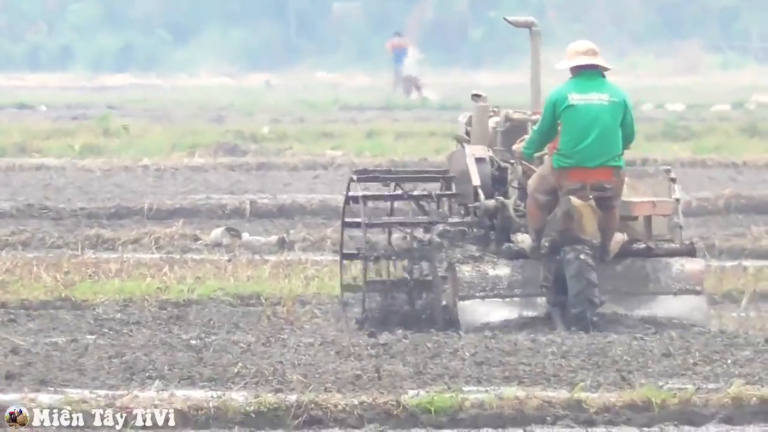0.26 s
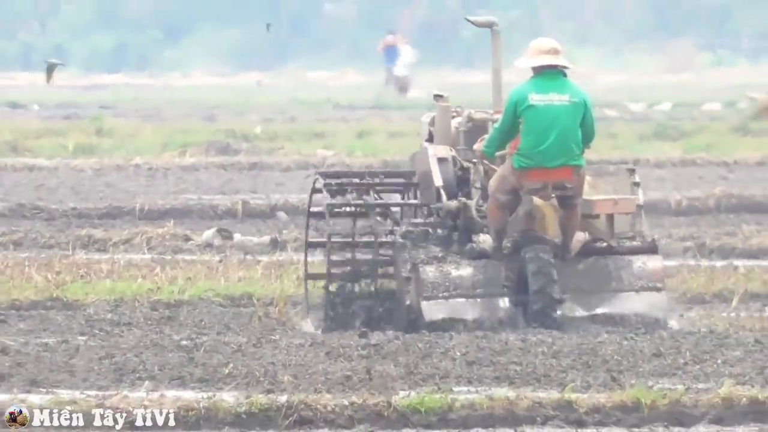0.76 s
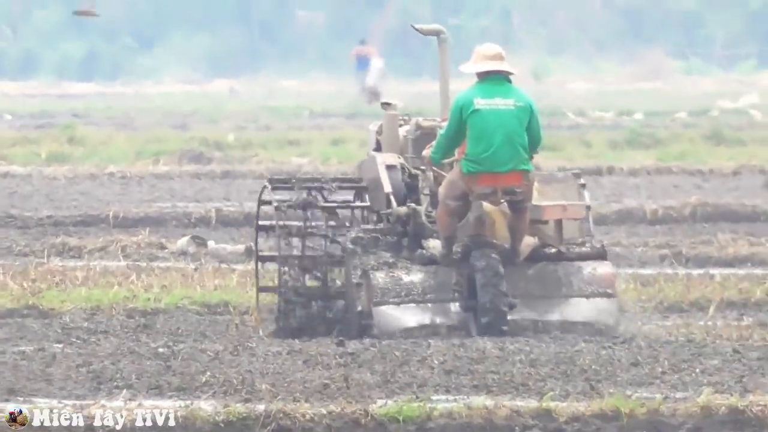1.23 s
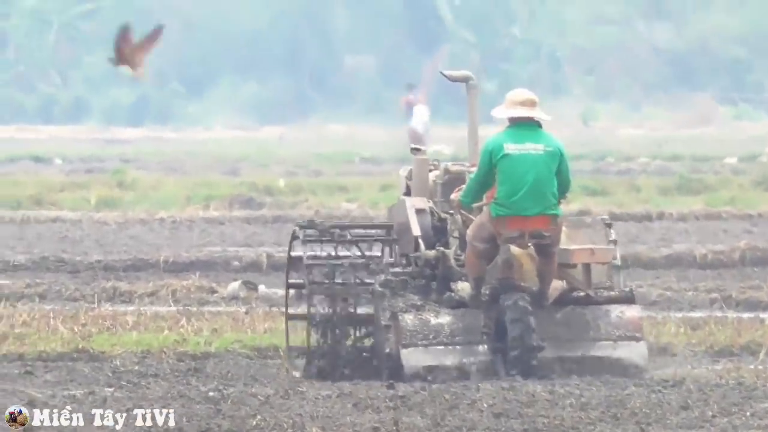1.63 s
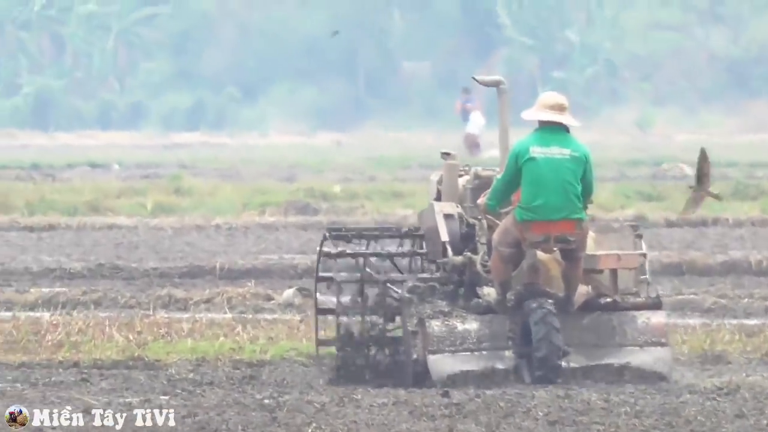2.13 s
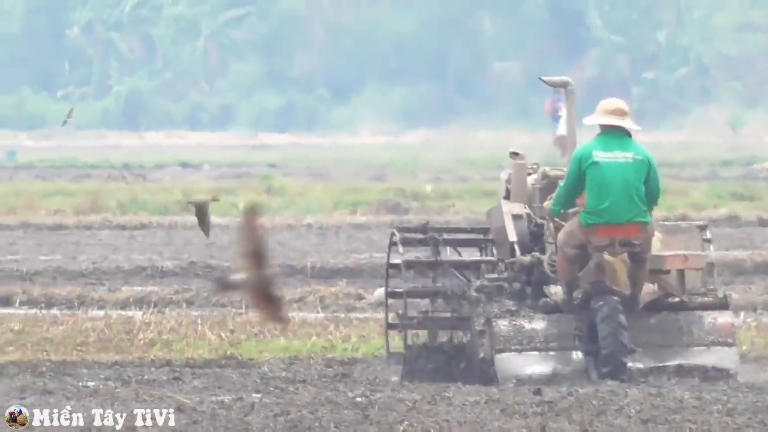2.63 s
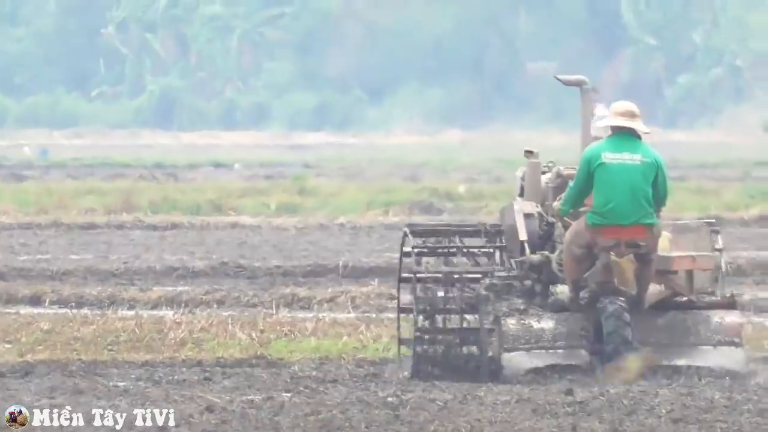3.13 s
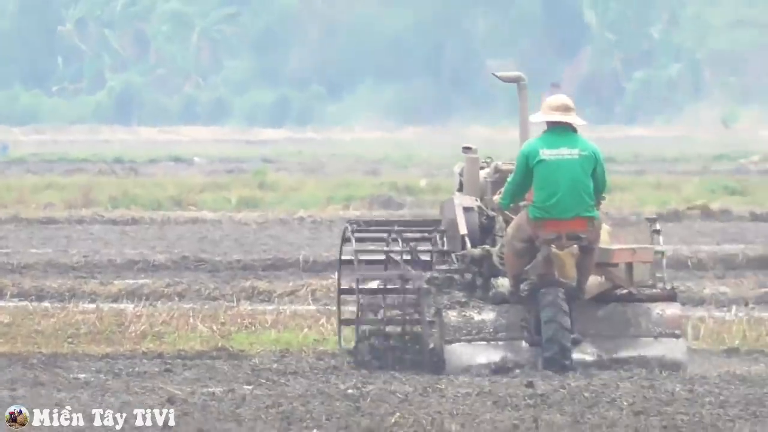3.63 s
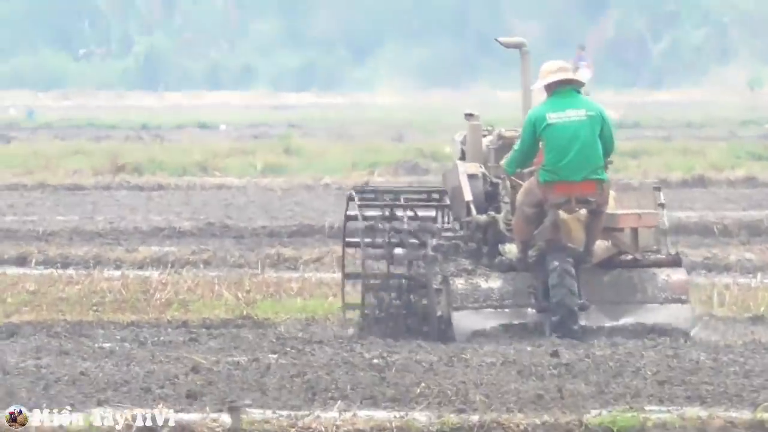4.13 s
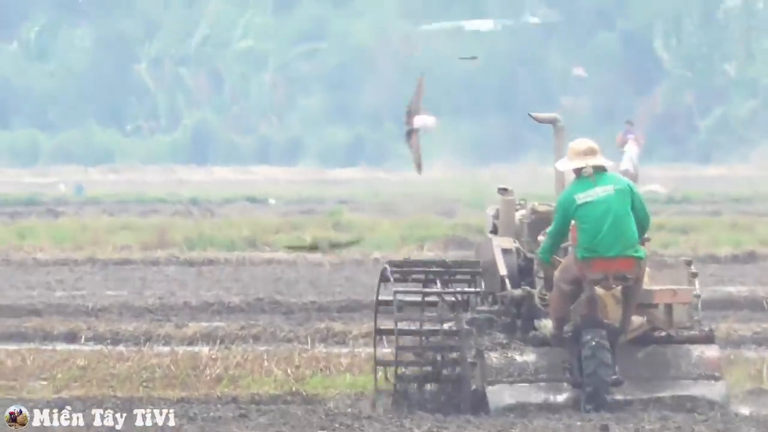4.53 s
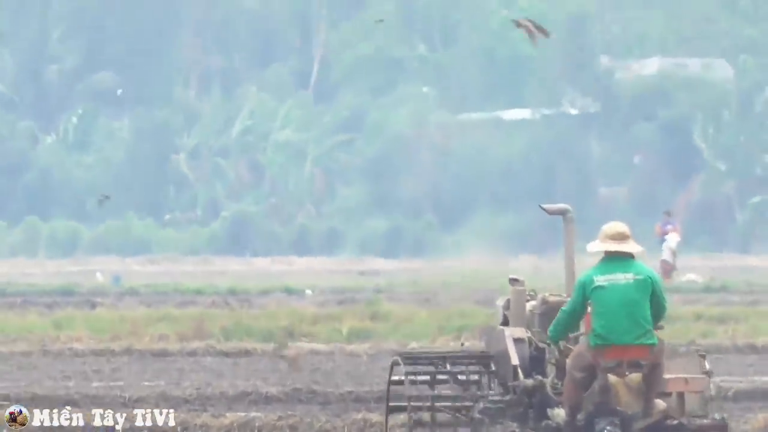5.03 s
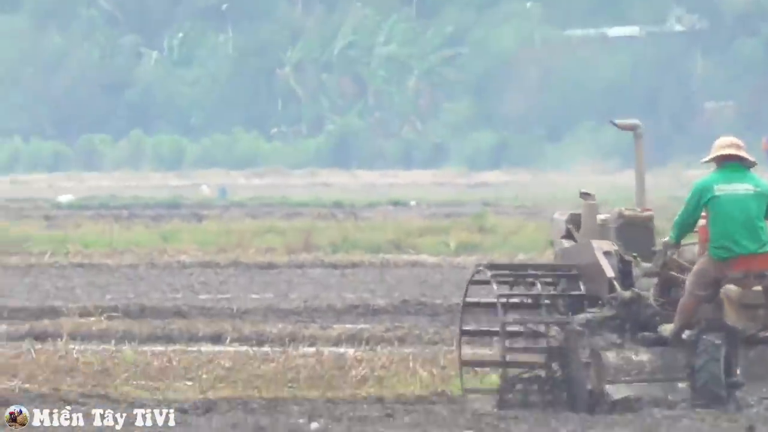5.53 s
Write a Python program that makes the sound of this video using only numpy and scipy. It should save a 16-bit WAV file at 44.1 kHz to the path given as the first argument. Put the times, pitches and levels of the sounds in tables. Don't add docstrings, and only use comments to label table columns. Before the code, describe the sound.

A windy open field, heard through a bare microphone. From the start, deep wind buffeting dominates: irregular soft thumps and a fluttering rumble, very close and much louder than anything else, broken by tiny lulls. Far off, a single-cylinder tiller runs at nearly constant speed, about fifteen firings a second. Only its upper part gets through: short, dry, hissing puffs with a slightly pipe-like rasp, over a thin mechanical rattle. It is faint at first, comes forward from about 0.5 s and is strongest around 1.2-1.8 s, then grows more uneven. A barely audible thin whine wavers between about 1.2 and 4.3 s. Scattered clacks of metal and mud appear near 2.3 s and more often from 4.6 to 5.6 s. After 3.2 s the gusts get stronger and rougher, with sharper flutters near 5.4 s, while the engine's puffs are generally weaker. Wind and engine continue to the end, 5.76 s.

```python
import sys
import numpy as np
from scipy import signal
from scipy.fft import rfft, irfft
from scipy.io import wavfile
from scipy.ndimage import uniform_filter1d

SR = 44100
rng = np.random.default_rng(int(sys.argv[2]) if len(sys.argv) > 2 else 0)


def nominal_scale(level):
    x = np.asarray(level, float) / 20
    return 10 ** x


def int16_out(signal):
    q = np.round(np.clip(np.atleast_2d(signal).T, -1, 1) * 32767)
    wavfile.write(sys.argv[1], SR, q.astype(np.int16))


N = 254016

# (time [s], rate [firings/s])
SPEED = [
    (0, 15.0),
    (1.95, 15.0),
    (2.15, 15.106),
    (3.94, 15.106),
    (4.14, 15.035),
    (5.76, 15.02),
]
# (time [s], lateness [ms])
HUNTING = [(0, -1), (.35, -1.8), (1.2, 1.2), (1.5, .5), (1.9, -2), (2.2, -3.5), (2.55, -4.8), (2.75, -3),
           (2.9, -.8), (3.4, .3), (4.2, .4), (4.9, 1.5), (5.3, 0), (5.76, -1.8)]
# (time [s], strength [dB], brightness [dB])
BARK = [(0, -70, 0), (.25, -62.5, 2), (.39, -54, -13), (1.1, -56, -1), (2.3, -55, -4), (2.8, -57, 1),
        (3.2, -54.5, -3), (3.8, -53.5, -12), (4.35, -51, -6), (4.44, -63, -7), (4.52, -54.5, -6),
        (4.75, -57.5, -5), (4.97, -50.5, -12), (5.25, -58, 2), (5.76, -55, -7)]
# (time [s], strength [dB], brightness [dB], loudest pitch [Hz])
ODD_FIRINGS = [(0.521, -49.5, -7, 2660), (0.587, -51.5, -5, 2870), (0.654, -47, -3.5, 3730),
               (0.721, -49.5, -3, 3080), (0.787, -50.5, 2, 3260), (0.854, -54.0, 2.5, 2840),
               (0.921, -53.5, 0, 3500), (0.987, -54.5, -1.5, 3380), (1.187, -49, -5, 2900),
               (1.254, -49.5, -3.0, 3340), (1.321, -45.5, -4, 3530), (1.387, -46, -9.5, 2990),
               (1.454, -48.5, -8, 2830), (1.521, -45, -10.5, 2520), (1.587, -46, -12, 3220),
               (1.654, -45, -8, 3250), (1.721, -45.5, -17, 2620), (1.787, -49.5, -5, 2880),
               (1.854, -51, -2, 2280), (1.921, -53.5, -3, 3280), (1.987, -50.5, -4, 2860),
               (2.054, -53, -1.5, 2490), (2.12, -53, -5, 3100), (2.517, -51, -8, 3200),
               (2.584, -49, -6, 2860), (2.65, -53, 2.5, 2620), (2.716, -51.5, -3.5, 2490),
               (2.848, -49.5, -13, 2340), (2.915, -48.5, -4, 2650), (2.981, -50.5, -1.5, 2740),
               (3.113, -50.5, -9, 2860), (3.246, -50, -8, 3080), (3.312, -50, -9, 2560),
               (3.378, -58.5, 3, 2380), (3.444, -57.5, 2, 2380), (3.51, -52, -9, 2720),
               (3.643, -52, -8, 2460), (3.709, -52.5, -3, 2400), (3.908, -49, -10, 2580),
               (3.974, -54, -8, 3320), (4.04, -54, -3, 2360), (4.106, -52, -2, 2480),
               (4.173, -50, -6, 2940), (4.239, -51.5, -4.5, 3240), (5.038, -51, -7.5, 3350),
               (5.104, -54.5, 0, 3330), (5.171, -50.5, -6.5, 3340), (5.371, -49, -9, 2650),
               (5.504, -51.5, -8, 3130), (5.703, -51, -4, 3420)]
# (time [s], first [Hz], second [Hz], outlet [Hz])
RINGS = [(0.521, 2540, 3160, 9097), (0.587, 2411, 3466, 7375), (0.654, 3750, 4270, 9100),
         (0.721, 2900, 4270, 8540), (0.787, 4230, 3100, 9840), (0.854, 2422, 4630, 9400),
         (0.921, 3680, 2950, 8171), (0.987, 3400, 2910, 9300), (1.188, 3170, 2000, 8360),
         (1.254, 3180, 3980, 9614), (1.321, 3950, 3300, 8900), (1.387, 2500, 3720, 9237),
         (1.454, 3070, 2180, 5300), (1.521, 2880, 2300, 8451), (1.587, 3520, 2950, 7000),
         (1.654, 2800, 3930, 8279), (1.721, 2099, 4240, 7310), (1.787, 3510, 2411, 7100),
         (1.853, 2153, 4060, 10600), (1.921, 4440, 2920, 9302), (1.987, 3251, 2228, 8344),
         (2.054, 2340, 3359, 6061), (2.12, 2648, 3380, 7224), (2.517, 3430, 2960, 8473),
         (2.583, 3300, 2110, 7202), (2.65, 2454, 3070, 8700), (2.715, 2480, 2045, 9560),
         (2.848, 2300, 2853, 8451), (2.914, 2850, 2170, 8204), (2.981, 3700, 2570, 7900),
         (3.113, 2928, 2070, 7396), (3.246, 4040, 2140, 9011), (3.312, 2460, 3779, 6370),
         (3.378, 2110, 3760, 8387), (3.444, 2196, 3640, 8800), (3.51, 2870, 2110, 9410),
         (3.643, 2090, 3760, 9200), (3.709, 2476, 3450, 8860), (3.908, 2450, 3500, 8850),
         (3.974, 3219, 3780, 8720), (4.04, 2540, 3570, 8914), (4.108, 2500, 3079, 7084),
         (4.173, 3628, 2380, 6350), (4.239, 2540, 3630, 8882), (5.038, 3811, 2885, 9205),
         (5.104, 4069, 2939, 8764), (5.171, 3122, 3860, 8400), (5.37, 2800, 3460, 6350),
         (5.504, 4274, 3068, 9119), (5.703, 3830, 4470, 9130)]
# (frequency [Hz], width [Hz], level [dB])
STACK = [(2100, 470, -12), (2345, 620, 8), (2990, 1900, -3), (3490, 440, 4.5), (4150, 880, 5.5),
         (4400, 540, 2)]
# (frequency [Hz], width [Hz], level [dB])
OUTLET = [(5350, 350, 2), (6240, 450, -1), (7240, 640, -4), (8460, 870, -7), (9130, 1100, -3.5),
          (10100, 520, -8.5), (10800, 1000, -6), (12800, 2400, -16)]
# (frequency [Hz], density [dB per Hz])
RATTLE_SPECTRUM = [(900, -7), (1500, -13), (1900, -5), (2500, -9), (3800, -10.5), (4500, -11.5),
                   (5000, -16.5), (5800, -16), (6600, -15.5), (8600, -12), (10000, -14.5), (12000, -19.5),
                   (14000, -25), (16000, -24)]
# (time [s], level [dB])
RATTLE_LEVEL = [(0.0, -60), (0.24, -60), (0.58, -56), (0.87, -58.5), (1.2, -57.5), (1.43, -56.5),
                (2.1, -56), (2.31, -54.5), (3.13, -56), (3.29, -55), (3.64, -57), (4.19, -56), (4.62, -61),
                (4.83, -60), (5.34, -55), (5.47, -54.5), (5.76, -58.5)]
# (time [s], peak [dB], treble against peak [dB])
CLACKS = [(2.0921, -54, 9), (2.295, -43.5, 3), (3.095, -51.5, 10), (3.2276, -60, -30), (4.2954, -51.5, 9.5),
          (4.594, -47, 1), (4.9337, -54, -29), (5.0934, -48, 5), (5.1956, -56, 8), (5.296, -41, -7),
          (5.476, -41, -40), (5.5523, -40, -21.5), (5.594, -49, 2)]
# (time [s], frequency [Hz], level [dB])
WHINE = [(1.2, 1950, -74), (1.42, 1945, -60), (1.65, 1990, -60), (1.95, 1960, -70), (2.2, 1955, -74),
         (2.4, 1950, -69), (2.7, 1970, -73), (3.0, 1950, -71), (3.3, 1930, -80), (3.5, 1965, -69),
         (3.7, 1970, -58), (3.95, 1955, -70), (4.3, 1945, -76)]
# (time [s], level [dB])
WIND = [(0.0, -14), (0.19, -21), (0.24, -22.5), (0.32, -20.5), (0.95, -18.5), (1.4, -21.5), (2.4, -22),
        (2.75, -21.5), (3.0, -20), (3.1, -21.5), (3.42, -18.5), (3.5, -21), (3.75, -20), (4.2, -18),
        (4.8, -20), (5.1, -20), (5.5, -18), (5.76, -18)]
# (frequency [Hz], density [dB per Hz])
RUMBLE_SPECTRUM = [(12, -54), (20, -17), (113, -1.5), (184, -2.5), (377, -9), (651, -23), (816, -22.5),
                   (985, -25), (1800, -52.5), (2340, -86), (3960, -120)]
# (time [s], peak [dB], frequency [Hz])
BUFFETS = [(0.024, -7.5, 181), (0.062, -9, 230), (0.087, -8, 208), (0.145, -13, 214), (0.166, -11.5, 183),
           (0.184, -12, 236), (0.29, -12.5, 171), (0.314, -12.5, 158), (0.388, -12, 220), (0.418, -10, 189),
           (0.455, -8, 240), (0.492, -8.5, 160), (0.556, -11.5, 219), (0.583, -12.5, 161),
           (0.627, -16, 190), (0.676, -14, 202), (0.698, -10, 180), (0.72, -11, 159), (0.796, -14.3, 183),
           (0.844, -12.5, 264), (0.89, -6, 194), (0.923, -13.7, 185), (0.96, -6, 209), (1.001, -7.5, 212),
           (1.049, -11.5, 203), (1.085, -10.5, 234), (1.196, -7.5, 195), (1.262, -12.5, 237),
           (1.311, -13, 248), (1.41, -14.5, 194), (1.442, -11.5, 162), (1.48, -15.8, 126),
           (1.542, -14, 205), (1.596, -11.5, 267), (1.664, -10, 161), (1.72, -14, 181), (1.791, -19, 176),
           (1.822, -14.5, 212), (1.869, -9, 212), (1.897, -23, 182), (2.006, -12, 174), (2.079, -9, 159),
           (2.173, -16, 194), (2.23, -14.5, 148), (2.388, -13, 200), (2.428, -15, 177), (2.567, -14, 193),
           (2.659, -11, 165), (2.828, -13.5, 206), (2.873, -7, 191), (2.911, -13, 148), (2.95, -11, 121),
           (2.988, -5.5, 191), (3.033, -10, 189), (3.105, -14.5, 175), (3.164, -8.5, 187),
           (3.251, -14, 199), (3.311, -7.5, 154), (3.368, -14, 165), (3.397, -9.5, 206),
                (3.425, -6.5, 167), (3.468, -10.5, 230), (3.556, -12.5, 171), (3.573, -10.5, 208),
                (3.596, -10, 228), (3.621, -13, 152), (3.654, -13, 169), (3.698, -16, 226),
                (3.759, -8, 228), (3.787, -7.5, 191), (3.862, -10.5, 168), (3.933, -8.5, 195),
                (3.992, -14.6, 224), (4.038, -4.5, 180), (4.122, -10, 227), (4.15, -12, 187),
                (4.174, -10.5, 155), (4.211, -5.5, 171), (4.271, -6.5, 164), (4.311, -5, 192),
                (4.344, -22, 159), (4.394, -15.5, 204), (4.45, -5.5, 190), (4.506, -13.4, 182),
                (4.53, -7, 263), (4.567, -12.3, 187), (4.62, -15, 174), (4.696, -15, 222),
                (4.739, -13, 195), (4.759, -14.1, 197), (4.838, -16.5, 168), (4.894, -14.5, 207),
                (4.914, -13, 184), (4.986, -8, 168), (5.004, -11, 180), (5.056, -14, 165),
                (5.109, -8.5, 157), (5.143, -8.5, 177), (5.179, -15.5, 159), (5.227, -13, 200),
                (5.268, -12.5, 230), (5.307, -17, 170), (5.344, -10, 177), (5.376, -11.5, 234),
                (5.42, -25, 226), (5.466, -18, 179), (5.494, -7, 220), (5.561, -8, 227), (5.591, -22, 220),
                (5.613, -12, 255), (5.67, -6.5, 265), (5.715, -14.5, 231)]
# (peak [dB], frequency [Hz], decay [s])
FIRST_SWING = (-12.5, 112, 0.0028)
# (time [s], depth [dB])
LULLS = [(0.039, -6.5), (0.127, -7), (0.241, -4), (0.368, -5.4), (0.649, -3), (0.87, -10), (0.934, 0),
         (1.072, -7.7), (1.455, 0), (1.617, -3.5), (1.807, -3), (1.977, -1), (2.13, -5), (2.197, -7.5),
         (2.349, -6.5), (2.459, -9), (2.9, 0.5), (3.021, -7), (3.081, -3), (3.485, -14), (3.713, -4),
         (3.841, -5), (3.897, -6), (4.094, -8), (4.246, -10), (4.29, -15), (4.486, -4), (4.65, -8),
         (4.848, -7.0), (5.022, -6), (5.196, -10), (5.293, -5.8), (5.695, -8.5), (5.745, -6.5)]
# (time [s], peak [dB], frequency [Hz])
FLAPS = [(0.017, -20, 840), (0.075, -32, 670), (0.113, -32, 677), (0.148, -32, 775), (0.43, -27, 671),
         (0.528, -23, 628), (0.592, -35, 670), (0.722, -25.5, 758), (0.744, -31, 707), (0.803, -30.5, 655),
         (0.882, -25, 672), (1.099, -25, 710), (1.186, -25, 678), (1.241, -27, 712), (1.275, -23, 680),
         (1.309, -26, 669), (1.354, -28.3, 754), (1.452, -30, 679), (2.017, -29.0, 818), (2.117, -23, 712),
         (2.555, -31, 668), (2.634, -27, 814), (2.672, -25, 766), (2.744, -30, 708), (2.918, -23, 807),
         (2.953, -28, 701), (2.986, -20.5, 788), (3.036, -28, 699), (3.111, -23, 746), (3.305, -26, 693),
         (3.332, -25, 729), (3.413, -38, 726), (3.613, -21, 674), (3.761, -26, 699), (3.918, -37, 642),
         (3.974, -29, 676), (4.009, -22.5, 726), (4.042, -33, 689), (4.122, -21.5, 699), (4.158, -24, 763),
         (4.244, -21, 733), (4.307, -35, 731), (4.357, -38, 744), (4.412, -28, 717), (4.445, -26, 705),
         (4.534, -25.9, 690), (4.594, -33, 750), (4.669, -27.3, 725), (4.727, -31, 720), (4.76, -24, 665),
         (4.835, -40, 704), (4.893, -28.7, 710), (4.936, -20, 868), (4.979, -23.5, 693),
         (5.342, -21.5, 696), (5.386, -22, 725), (5.452, -16, 722), (5.502, -20, 835), (5.614, -18, 689),
         (5.666, -23, 805)]
# (frequency [Hz], density [dB per Hz])
GRILLE_SPECTRUM = [(80, -35.0), (300, 12.5), (600, 7.5), (1100, -6.0), (1500, -13.0), (2200, -61.0),
                   (4000, -83)]


def exhaust():
    s, strength_db, bright_db, low_hz, high_hz = firings()
    s = s + lateness(s) - 0.0034 + 0.0003 * rng.standard_normal(len(s))
    low = puffs(s, strength_db + 12.0, low_hz, STACK, lean_db=40, rise=0.0022, fall=0.003)
    high = puffs(s, strength_db + bright_db + 18, high_hz, OUTLET, lean_db=19.5, rise=0.0022, fall=0.0025)
    thud = rng.standard_normal(N) * bursts(s, strength_db + 20, rise=0.003, fall=0.0054)
    thud = resonance(thud, hz=1095, width=505)
    tail = coloured(rng.standard_normal(N), RATTLE_SPECTRUM)
    tail = tail * bursts(s, strength_db + 6.0, rise=0.0085, fall=0.0081)
    return low + high + thud + band_pass(tail, 1900, 11500, order=3)


def firings():
    first_firing_s = 0.054
    turns = np.cumsum(in_time(SPEED)[0]) / SR - first_firing_s * SPEED[0][1]
    at = np.searchsorted(turns, np.arange(int(turns[-1]) + 1))
    chance = np.clip(rng.standard_normal((len(at), 4)).T, -1.5, 1.5)
    uneven_db = [[1.2], [2.0]]
    strength_db, bright_db = np.array(in_time(BARK))[:, at] + uneven_db * chance[:2]
    low_hz = 3130 * 2 ** (0.31 * chance[2])
    high_hz = 8240 * 2 ** (0.18 * chance[3])
    odd_s, *odd = np.transpose(ODD_FIRINGS)
    which = np.round(turns[(odd_s * SR).astype(int)]).astype(int)
    strength_db[which], bright_db[which], low_hz[which] = odd
    return at / SR, strength_db, bright_db, low_hz, high_hz


def lateness(s):
    return np.interp(s, *np.transpose(HUNTING)) / 1000


def puffs(s, level_db, loudest_hz, modes, lean_db, rise, fall):
    valve_db, valve_lead_s = -15.0, 0.005
    out, chance = 0, rng.standard_normal((len(s), len(modes)))
    for k, (hz, width, mode_db) in enumerate(modes):
        lean = np.minimum(lean_db * np.abs(np.log2(hz / loudest_hz)), 14.0)
        mode_level_db = level_db + mode_db - lean + 3.2 * np.clip(chance[:, k], -2, 1.3)
        gate = bursts(s, mode_level_db, rise, fall)
        valve = bursts(s - valve_lead_s, mode_level_db, rise=0.0006, fall=0.0011)
        gate = gate + nominal_scale(valve_db) * valve
        out = out + gate * evened(resonance(rng.standard_normal(N), hz, width), 0.004)
    return out


def rings(rise, fall):
    out, t = np.zeros(N + SR), np.arange(SR // 25) / SR
    shape = (1 - np.exp(-t / rise)) ** 2 * np.exp(-t / fall)
    shape = shape / shape.max()
    phases = rng.random((len(RINGS), 3))
    for (s, *pitches), (_, strength_db, bright_db, _), turns in zip(RINGS, ODD_FIRINGS, phases):
        at = int((s + lateness(s) - 0.0036) * SR)
        for hz, share_db, turn in zip(pitches, [0, -2, bright_db + 1], turns):
            tone = np.sin(2 * np.pi * (hz * t + turn))
            out[at:at + len(t)] += nominal_scale(strength_db - 1 + share_db) * shape * tone
    return out[:N]


def rattle():
    white = [coloured(rng.standard_normal(N), RATTLE_SPECTRUM) for _ in range(2)]
    out, edges = 0, 1200 * 2 ** np.arange(0, 4, 1 / 3)
    shared_db = 1.0 * drift(45)
    for k, (lo_hz, hi_hz) in enumerate(zip(edges, edges[1:])):
        band = band_pass(white[k % 2], lo_hz, hi_hz, order=2)
        ticks = rng.random(N) < 15 / SR
        ticks = ticks * nominal_scale(3.0 * np.minimum(rng.exponential(1, N), 2.2))
        grain = 1 + 0.5 * signal.lfilter([1], np.poly([0.992, 0.992]), ticks) / 46
        out = out + band * grain * nominal_scale(shared_db + 0.28 * drift(18) + 0.57 * drift(4))
    return nominal_scale(in_time(RATTLE_LEVEL)[0] - 2.0) * rms_one(out)


def clacks():
    s, peak_db, treble_db = np.transpose(CLACKS)
    noise = rng.standard_normal((2, N))
    low = noise[0] * bursts(s - 0.0015, peak_db - 2.0, rise=0.0025, fall=0.0027)
    high = noise[1] * bursts(s - 0.0015, peak_db + treble_db - 0.5, rise=0.002, fall=0.0037)
    return resonance(low, hz=3200, width=2600) + resonance(high, hz=8600, width=4000)


def whine():
    hz, level_db = in_time(WHINE)
    t = np.arange(N) / SR
    fade_in = np.clip((t - WHINE[0][0]) / 0.25, 0, 1)
    fade_out = np.clip((WHINE[-1][0] - t) / 0.3, 0, 1)
    level = np.sqrt(2) * fade_in * fade_out * nominal_scale(level_db - 5.0 + 3.0 * drift(12))
    return level * np.sin(2 * np.pi * np.cumsum(hz + 12 * drift(23.6)) / SR)


def eddies(table, cycles, level_db):
    out = np.zeros(N + 2 * SR)
    for (s, peak_db, hz), turn in zip(table, rng.random(len(table))):
        t = np.arange(int(cycles / hz * SR)) / SR
        at = SR + int(s * SR) - len(t) // 2
        swing = np.hanning(len(t)) * np.sin(2 * np.pi * (hz * t + turn))
        out[at:at + len(t)] += nominal_scale(peak_db + level_db) * swing
    return out[SR:SR + N]


def first_swing(peak_db, hz, fall):
    t = np.arange(N) / SR
    return nominal_scale(peak_db) * np.exp(-t / fall) * np.cos(2 * np.pi * hz * t)


def flaps(per_s):
    weak_s = np.flatnonzero(rng.random(N) < per_s / SR) / SR
    weak_db = -46 + 3.93 * np.minimum(rng.exponential(1, len(weak_s)), 3.0)
    s, peak_db, _ = np.transpose(FLAPS)
    gate = bursts(weak_s, weak_db, rise=0.003, fall=0.003)
    gate = gate + bursts(s - 0.005, peak_db - 5.0, rise=0.003, fall=0.006)
    noise = rms_one(coloured(rng.standard_normal(N), GRILLE_SPECTRUM))
    flutter = gate * evened(noise, 0.0074)
    return signal.sosfilt(signal.butter(3, 1750, fs=SR, output="sos"), flutter)


def wind(wind_db):
    white = [coloured(rng.standard_normal(N), RUMBLE_SPECTRUM) for _ in range(2)]
    shared_db = 2.0 * drift(14) + 1.5 * drift(60)
    edges = 34 * 2 ** np.arange(0, 6.5, 0.5)
    low, high = 0, 0
    for k, (lo_hz, hi_hz) in enumerate(zip(edges, edges[1:])):
        band = band_pass(white[k % 2], lo_hz, hi_hz, order=2)
        band = band * nominal_scale(0.6 * shared_db + 0.83 * drift(22.0))
        if hi_hz < 560:
            low = low + band
        else:
            high = high + band
    low = (low + evened(low, 0.03)) / 2
    rumble_db = wind_db - 1
    rush_db = -38 - 0.6 + 0.49 * np.arange(N) / SR + 0.37 * (wind_db - wind_db.mean())
    return nominal_scale(rumble_db) * rms_one(low) + nominal_scale(rush_db) * rms_one(high)


def dips(times, depth_db, span_s):
    marks = np.zeros(N)
    marks[(np.asarray(times) * SR).astype(int)] = depth_db
    return nominal_scale(signal.oaconvolve(marks, np.hanning(int(span_s * SR)), "same"))


def bursts(times, level_db, rise, fall):
    marks = np.zeros(N)
    marks[np.clip((np.asarray(times) * SR).astype(int), 0, N - 1)] = nominal_scale(level_db)
    t = np.arange(SR // 10) / SR
    shape = (1 - np.exp(-t / rise)) ** 2 * np.exp(-t / fall)
    return signal.oaconvolve(marks, shape / shape.max())[:N]


def resonance(x, hz, width):
    r = np.exp(-np.pi * width / SR)
    section = [(1 - r * r) / 2, 0, (r * r - 1) / 2, 1, -2 * r * np.cos(2 * np.pi * hz / SR), r * r]
    return signal.sosfilt([section, section], x)


def band_pass(x, lo_hz, hi_hz, order):
    return signal.sosfilt(signal.butter(order, [lo_hz, hi_hz], "band", fs=SR, output="sos"), x)


def coloured(x, spectrum):
    hz, level_db = np.transpose(spectrum)
    grid = np.log(np.fft.rfftfreq(N, 1 / SR) + 1)
    return irfft(rfft(x) * nominal_scale(np.interp(grid, np.log(hz), level_db, right=-90)), N)


def evened(x, span_s):
    power = uniform_filter1d(x ** 2, int(span_s * SR))
    return x * np.std(x) / np.sqrt(power + 1e-3 * np.var(x))


def drift(rate):
    r = np.exp(-2 * np.pi * rate / SR)
    return rms_one(signal.lfilter([1], [1, -2 * r, r * r], rng.standard_normal(N + SR))[SR:])


def rms_one(x):
    return x / np.sqrt(np.mean(x ** 2) + 1e-20)


def in_time(rows):
    s, *columns = np.transpose(rows)
    return [np.interp(np.arange(N) / SR, s, c) for c in columns]


def thinned(x):
    from_hz = 4700
    hz, _, cells = signal.stft(x, SR, nperseg=1024)
    chance = uniform_filter1d(rng.standard_normal(cells.shape), size=4, axis=-1)
    chance = uniform_filter1d(chance, size=6, axis=-2)
    level = np.log(uniform_filter1d(np.abs(cells) ** 2, size=20, axis=-2) + 1e-20)
    share = 0.075 * np.log2((hz + 1) / from_hz) ** 3 + 0.1 * (hz < 7000) + 0.4 * (hz > 15300)
    share = (np.clip(share + 0.02, 0, 0.8) * (hz > from_hz))[:, None]
    rank = np.argsort(np.argsort(chance + 0.12 * level, axis=-1), axis=-1) / cells.shape[-1]
    cells = cells * np.where(rank < share, nominal_scale(-30.0), 1)
    return signal.istft(cells, SR, nperseg=1024)[1][..., :N]


def scene():
    machine = exhaust() + rings(rise=0.0014, fall=0.004) + rattle() + clacks() + whine()
    strong = BUFFETS
    lull_s, depth_db = np.transpose(LULLS)
    calm = dips(lull_s, 0.7 * depth_db, span_s=0.026)
    giving_way = dips([row[0] for row in strong], -2.5, span_s=0.014)
    air = wind(*in_time(WIND)) * calm * giving_way + first_swing(*FIRST_SWING)
    air = air + eddies(strong, cycles=3.59, level_db=-1.0) + calm * flaps(per_s=130)
    air = air + eddies(FLAPS, cycles=6.0, level_db=-7.0)
    return (machine + air)[None, :]


def roll_off(x):
    return signal.sosfilt(signal.butter(12, 15820, fs=SR, output="sos"), x)


def record(dry):
    rounded = 1.5 * np.tanh(dry / 1.5)
    return roll_off(thinned(rounded))


dry = scene()
out = record(dry)
int16_out(out)
```